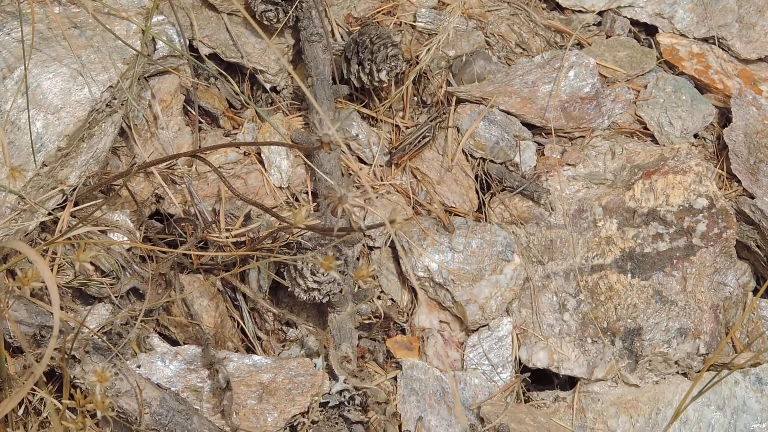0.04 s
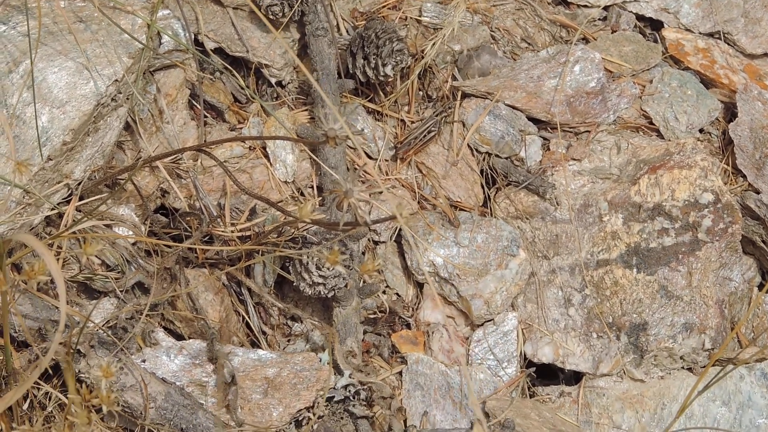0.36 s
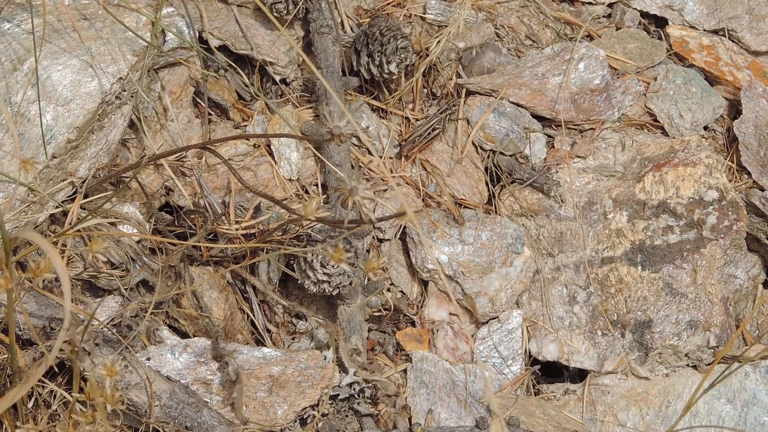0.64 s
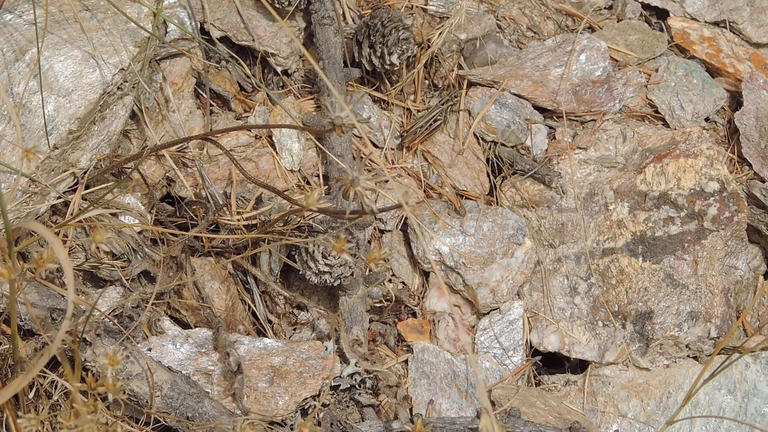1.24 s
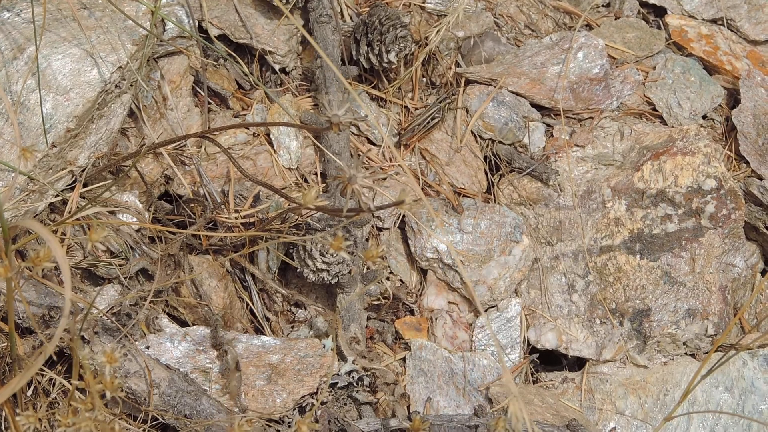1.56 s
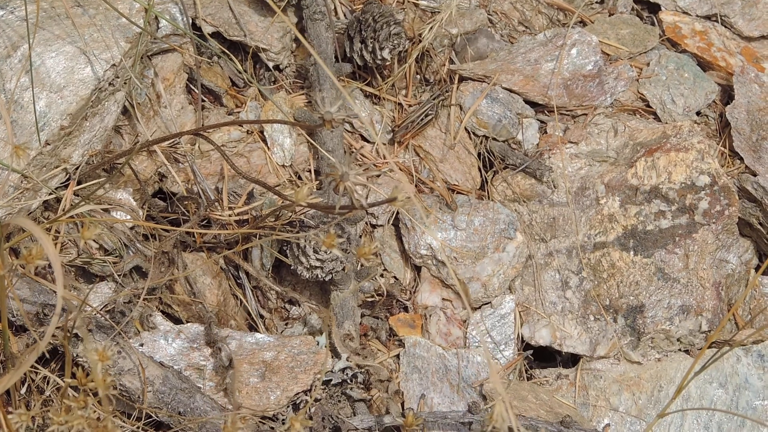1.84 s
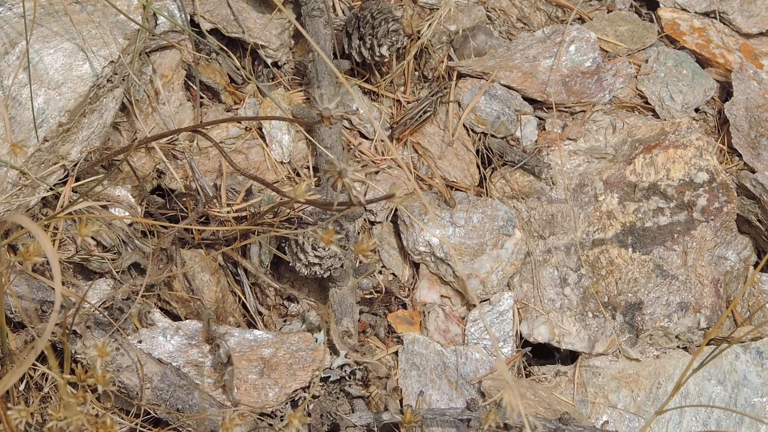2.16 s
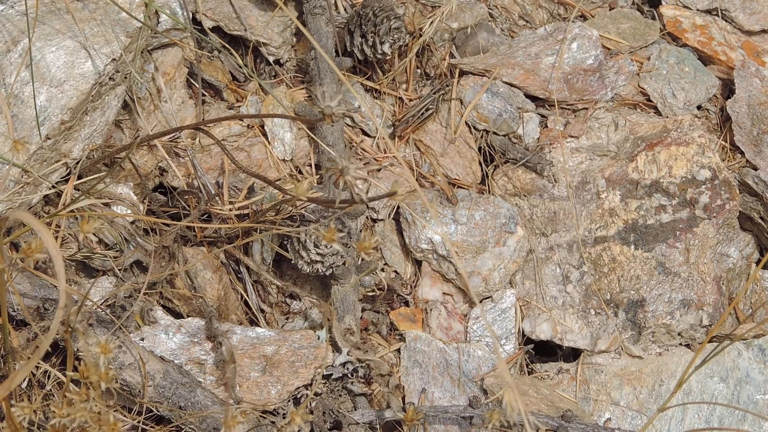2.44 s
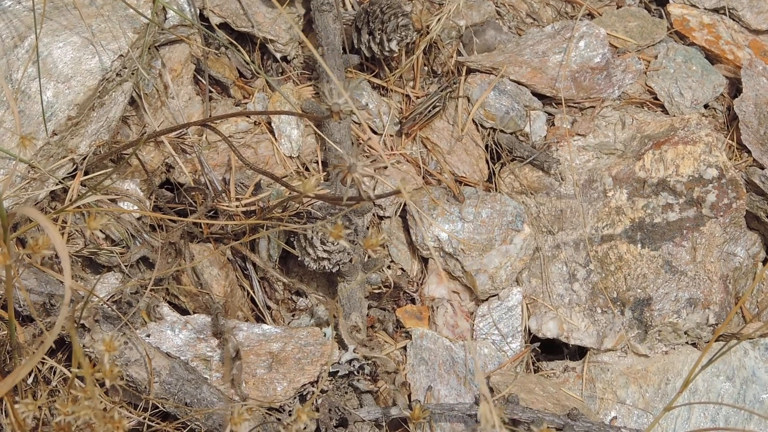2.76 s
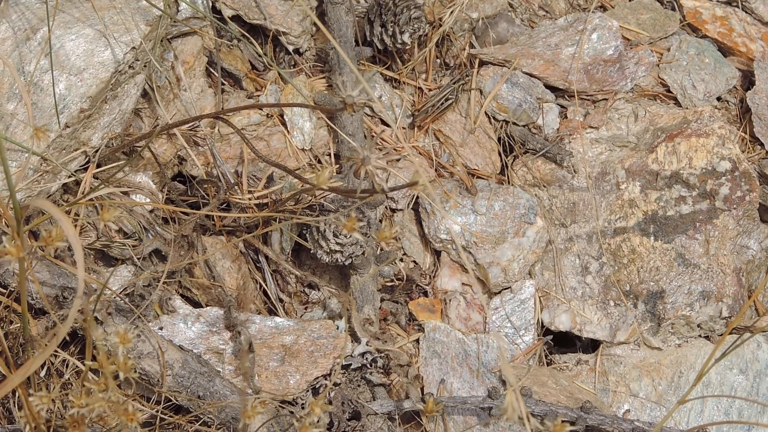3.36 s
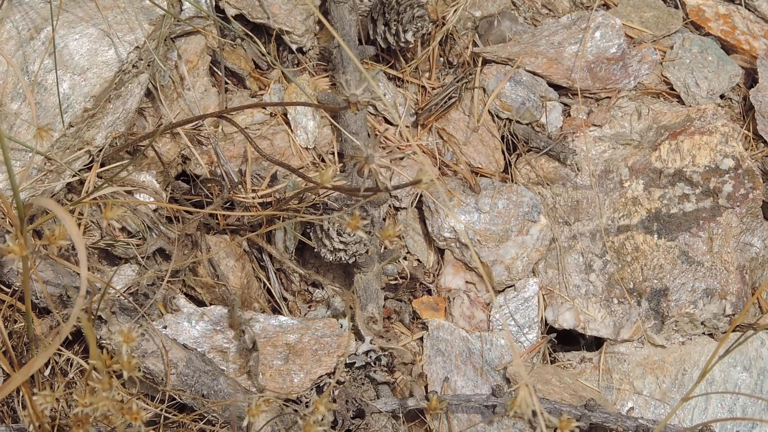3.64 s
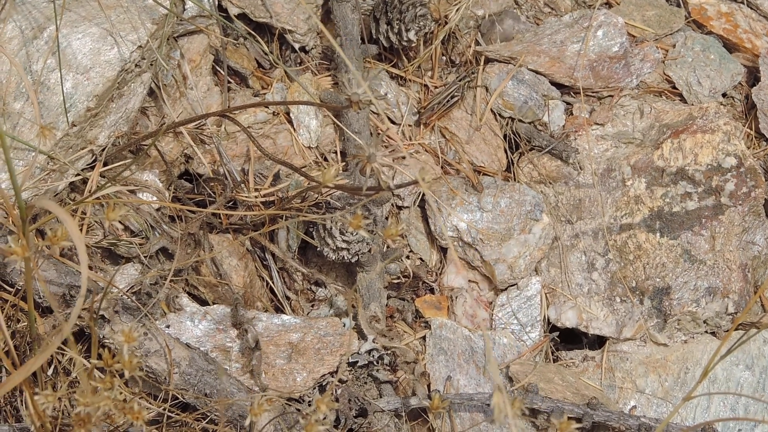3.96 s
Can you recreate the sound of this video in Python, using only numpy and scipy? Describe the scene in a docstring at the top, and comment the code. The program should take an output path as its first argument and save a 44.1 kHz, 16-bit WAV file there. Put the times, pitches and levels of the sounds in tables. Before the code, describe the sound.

Light, gusty wind rumbles and thumps on the microphone, mostly on the right, over a faint outdoor hiss. Near the end, a grasshopper on dry, stony ground begins a faint, high, pulsing buzz that swells.

```python
"""On dry stony ground, a light, gusty wind buffets the two ports (openings) of a microphone,
mostly the right one. Its eddies, small swirls of air, rumble and thump over a faint outdoor hiss.
Near the end a grasshopper starts to sing, and its song swells. Each leg stroke drags a file of tiny
teeth over the wing and makes it ring in short pulses, one strong and then several weaker."""
import sys
import numpy as np
from scipy import signal
from scipy.fft import rfft, irfft
from scipy.io import wavfile
from scipy.ndimage import uniform_filter1d

SR = 44100
rng = np.random.default_rng(int(sys.argv[2]) if len(sys.argv) > 2 else 0)


def to_wav(sig):
    """Store sig (one row per channel, or 1-D mono) as 16-bit WAV at the path in sys.argv[1].

    Samples outside -1..1 are clipped; the rate is SR.
    """
    pcm = np.clip(np.atleast_2d(sig), -1, 1) * 32767
    pcm = np.round(pcm).astype(np.int16)
    wavfile.write(sys.argv[1], SR, pcm.T)  # frames by channels


N = 176400
TIME = np.arange(N) / SR


def from_db(db):
    """Turn decibels into a number to multiply a sound by."""
    return 10 ** (np.asarray(db) / 20)


def rms_one(x):
    """Scale a sound so that its average strength (rms) is 1."""
    return x / np.sqrt(np.mean(x ** 2) + 1e-20)


def even_out(x, samples):
    """Hold a sound's strength near 1, averaged over this many samples."""
    return x / np.sqrt(uniform_filter1d(x ** 2, size=samples) + 1e-9)


def level_at(points, hz):
    """Read a level between the rows of a tone table, giving each octave equal room."""
    f, db = np.transpose(points)
    return np.interp(np.log(hz), np.log(f), db)


def drift(hz):
    """A smooth random wobble of about 1 either way; a higher hz makes it quicker."""
    step, warm_up = 40, 2000
    pole = np.exp(-2 * np.pi * hz * step / SR)
    noise = rng.standard_normal(N // step + warm_up + 2)
    slow = signal.lfilter([1], [1, -2 * pole, pole * pole], noise)[warm_up:]
    return np.interp(np.arange(N) / step, np.arange(len(slow)), rms_one(slow))


def butter(x, hz, kind, order=2):
    """Keep the "low" part, the "high" part or one "band" of a sound."""
    return signal.sosfilt(signal.butter(order, hz, kind, fs=SR, output="sos"), x)


# Tone of a faint steady hiss, its treble cut away above about 13 kHz: f/Hz, relative level/dB
HISS_TONE = [(60, 4), (300, 0.5), (700, 2.5), (1600, -1), (2500, -4.5), (4000, -10), (7000, -14),
             (10000, -16.5), (13200, -18), (14200, -28), (16000, -32)]

def steady_hiss(level_db=-58, shared_power=0.073):
    """A steady, smooth hiss; left and right share only a little of it."""
    hz = np.maximum(np.arange(N // 2 + 1) * SR / N, 1)
    separate = np.sqrt(1 - shared_power) * rng.standard_normal((2, N))
    shared = np.sqrt(shared_power) * rng.standard_normal(N)
    spectrum = rfft(separate + shared) * from_db(level_at(HISS_TONE, hz))
    return from_db(level_db) * rms_one(irfft(spectrum, N))


# The wing's low ring and its high rings: f/Hz, width/Hz, relative level/dB
LOW_RING = (7520, 1470, -6.5)
HIGH_RINGS = [(10370, 3100, -19), (13300, 4500, -2.5), (15450, 610, -12)]

def wing_rasp(teeth_per_s=3900, tooth_spread_db=2):
    """Teeth click and scrape, and the wing rings. Gives two rows: low ring, high rings."""
    teeth_passed = np.floor(np.cumsum(teeth_per_s * (1 + 0.15 * drift(300))) / SR)
    new_tooth = np.diff(teeth_passed, prepend=0) > 0
    clicks = new_tooth * from_db(tooth_spread_db * rng.standard_normal(N))
    rasp = rms_one(clicks) + rng.standard_normal(N)

    def ring(hz, width_hz, db):
        return from_db(db) * rms_one(butter(rasp, [hz - width_hz / 2, hz + width_hz / 2], "band"))
    return np.array([ring(*LOW_RING), sum(ring(*row) for row in HIGH_RINGS)])


def leg_stroke(start, later_db, first_s=.012, later_s=.009, spacing_s=.0093):
    """The push of leg on wing: one strong pulse, then five fading, shorter ones over a light rub."""
    def pulse(onset, length_s):
        return np.sin(np.pi * np.clip((TIME - onset) / length_s, 0, 1))
    rub_db, rub_fade_db_per_s = -7, 68
    loss_per_pulse_db, spread_db = 1.1, 1.3
    rub = from_db(rub_db - rub_fade_db_per_s * np.abs(TIME - start)) * (TIME > start)
    force = np.maximum(rub, pulse(start, first_s))
    for k, (time_jitter, level_jitter) in enumerate(rng.standard_normal((5, 2))):
        onset = start + first_s + spacing_s * (k + .1 * time_jitter)
        db = later_db - loss_per_pulse_db * k + spread_db * level_jitter
        force = np.maximum(force, pulse(onset, later_s) * from_db(db))
    return force


# Leg strokes: t/s, level of the push/dB, extra for the low ring/dB, later pulses against the first/dB
LEG_STROKES = [(3.075, -74, 5, -2), (3.145, -70.5, 0, 0), (3.208, -61, -1, -5), (3.277, -60, -1, -2),
               (3.330, -58, -4, -3), (3.384, -57, -3.5, -3), (3.438, -56, -4, -6), (3.489, -57.5, -2, -4),
               (3.543, -54.5, 0.5, -6), (3.597, -55.5, -1, -3), (3.668, -55, -1.5, -2),
               (3.738, -55.5, -1.5, -2), (3.809, -54, -.5, -3), (3.879, -54.5, 3, -5),
               (3.950, -54.5, 4, -5)]

def grasshopper(echo_db=-5, echo_s=.08):
    """Leg strokes sound the wing; stones and twigs scatter a short echo, different on each side."""
    force = 0
    ends = [row[0] for row in LEG_STROKES[1:]] + [np.inf]
    for (start, db, low_db, later_db), end in zip(LEG_STROKES, ends):
        stroke = leg_stroke(start, later_db) * (TIME < end)
        force = force + stroke * from_db([[db + low_db], [db]])
    decay = from_db(-60 / (echo_s * SR)) ** 2   # the echo loses 60 dB in echo_s
    tail = np.sqrt(signal.lfilter([1 - decay], [1, -decay], force ** 2 + 1e-18))
    direct = np.sum(force * wing_rasp(), axis=0)
    echo = np.array([np.sum(tail * wing_rasp(), axis=0) for port in range(2)])
    return butter(direct + from_db(echo_db) * echo, hz=6200, kind="high", order=4)


# Rough puffs of wind: middle t/s, length/s, level before muffling/dB, top f/Hz
PUFFS = [(.466, 0.038, -34.5, 338), (0.514, 0.033, -29.5, 406), (0.532, 0.041, -33, 380),
         (0.754, .045, -37, 333), (0.963, 0.054, -40, 337)]

def rough_puffs(bottom_hz=209, muffle_hz=790):
    """Wind breaks into short swells of churning air, at the right port only."""
    right = np.zeros(N)
    for middle, length_s, db, top_hz in PUFFS:
        swell = np.cos(np.pi * np.clip((TIME - middle) / length_s, -.5, .5))
        churn = rms_one(butter(rng.standard_normal(N), [bottom_hz, top_hz], "band"))
        right += from_db(db) * swell * even_out(churn, samples=900)
    return np.array([np.zeros(N), butter(right, muffle_hz, "low")])


# Single eddies hitting a port: t/s, peak level on the louder side/dB, width/s, left minus right/dB
THUMPS = [(.072, -28.5, .0012, -17), (0.298, -20.5, .002, -24), (.408, -24, 0.0014, -22),
          (.459, -19.5, .0009, -30), (.507, -19, 0.0011, -26), (.515, -28.5, 0.00039, -30),
          (0.515, -26, .0014, 12), (.521, -13.5, 0.00107, -29), (.541, -16.5, .0012, -24),
          (.583, -21.5, 0.00083, -27), (.627, -19.5, .0015, -20), (.753, -13.5, 0.0014, -33),
          (.808, -27, 0.0017, 15), (.846, -26, 0.0012, 2), (.933, -20.5, 0.0012, -10),
          (0.966, -22.5, 0.0015, -20), (0.992, -24, 0.0011, -20), (1.196, -20.5, 0.0022, -12),
          (1.636, -24, 0.0017, 15), (1.803, -23.5, 0.00097, -29), (1.887, -29, 0.0013, 21),
          (1.924, -21, 0.0015, -20), (1.962, -23, .0012, -23), (2.104, -23, 0.0013, -19),
          (2.189, -28, .002, 20), (2.281, -25, 0.0014, 20), (2.485, -24.5, .0013, -18),
          (2.731, -26, 0.0025, 10), (3.168, -24.5, 0.0015, -23), (3.274, -24, 0.00096, -30),
          (3.378, -19, 0.0022, -20), (3.461, -21, 0.0013, -25), (3.556, -17.5, .0016, -28),
          (3.610, -19, .0016, -20), (3.785, -32, .0014, 17), (3.841, -23, .0014, -23)]

def eddy_thumps():
    """Each eddy thumps: one smooth push of air pressure between two shallow dips."""
    out = np.zeros((2, N))
    for middle, db, width_s, pan_db in THUMPS:
        offset = (TIME - middle) / width_s
        push = 2 * np.exp(-offset ** 2 / 2) - np.exp(-(offset / 2) ** 2 / 2)
        left_db, right_db = db + min(pan_db, 0), db + min(-pan_db, 0)
        out += from_db([[left_db], [right_db]]) * push
    return out


# Wind pressure at the left and right ports: t/s, level before trim/dB
LEFT_GUSTS = [(0, -43), (.1, -39), (.24, -55.5), (.35, -43.5), (.45, -43), (.52, -31), (.58, -38.5),
              (.68, -31), (.72, -38), (.79, -27.5), (.86, -34), (.96, -38), (1.03, -44), (1.25, -38),
              (1.64, -35.5), (1.72, -48), (1.79, -34.5), (1.9, -36), (2.08, -40), (2.34, -34.5),
              (2.42, -42), (2.54, -44), (2.62, -35.5), (2.78, -36.5), (2.92, -45.5), (3.22, -38.5),
              (3.34, -46), (3.5, -46), (3.62, -40.5), (3.7, -43), (3.77, -37.5), (4.0, -45.5)]
RIGHT_GUSTS = [(0, -43), (.07, -34), (.11, -50), (.2, -47), (.29, -28.5), (.42, -31.5), (.47, -20),
               (.53, -24), (.6, -23.5), (.66, -29), (.75, -19.5), (.81, -32.5), (.87, -26), (.97, -29.5),
               (1.14, -37.5), (1.2, -25), (1.25, -38), (1.3, -30.5), (1.38, -45), (1.5, -36), (1.58, -42),
               (1.68, -28), (1.73, -36), (1.81, -30), (1.88, -34.5), (1.95, -22.5), (2.01, -32.5),
               (2.1, -30.5), (2.39, -34.5), (2.47, -27.5), (2.54, -34.5), (2.86, -34), (2.93, -41.5),
               (2.99, -31), (3.08, -34.5), (3.2, -29.5), (3.33, -32), (3.62, -28.5), (3.72, -35),
               (3.82, -28.5), (4.0, -33.5)]
# Tone of the rumble before it is shifted: f/Hz, relative level/dB
RUMBLE_TONE = [(20, -3), (40, 5.5), (100, 0.5), (170, -7), (235, -19), (340, -29.5), (480, -46.5),
               (800, -81)]
# The rumble's tone drifts, deepening near 1.45 s and most near 2.85 s: t/s, tone shift/octaves
TONE_SHIFT = [(0, -0.06), (1.25, 0.027), (1.45, -0.24), (1.75, 0.083), (2.2, 0.057), (2.4, -0.14),
              (2.7, -0.026), (2.85, -0.42), (3.1, -0.16), (3.25, 0.019), (4.0, -0.049)]

def wind_rumble(gusts, reference_db=-23.5, octaves_per_db=-0.0089, flutter_db=3, trim_db=-0.65):
    """Swirling air rumbles at one port. Its bands of noise flutter together, the upper ones most."""
    level_db = np.interp(TIME, *np.transpose(gusts))
    gust_octaves = octaves_per_db * (level_db - reference_db)   # louder moves the tone slightly down
    shift = 2 ** (gust_octaves + np.interp(TIME, *np.transpose(TONE_SHIFT)))
    edges_hz = 18 * 2 ** (np.arange(19) / 3)   # three bands to an octave
    flutter = drift(hz=25.6)
    rumble, power = 0, 0
    for low, high in zip(edges_hz, edges_hz[1:]):
        hz = np.sqrt(low * high)
        band = rms_one(butter(rng.standard_normal(N + SR), [low, high], "band")[SR:])
        gain = from_db(level_at(RUMBLE_TONE, hz / shift)) * np.sqrt(high - low)
        rumble = rumble + band * gain * from_db(flutter_db * min(hz / 180, 2) * flutter)
        power = power + gain ** 2
    return even_out(rumble / np.sqrt(power), samples=3500) * from_db(level_db + trim_db)


def scene():
    """Wind on the ports, hiss all round, the grasshopper straight ahead."""
    rumble = np.array([wind_rumble(LEFT_GUSTS), wind_rumble(RIGHT_GUSTS)])
    wind = rumble + eddy_thumps() + rough_puffs()
    return wind + steady_hiss() + grasshopper()


def record(dry, cutoff_hz=15700):
    """Cut off the very highest treble steeply."""
    return signal.sosfilt(signal.ellip(12, .1, 80, cutoff_hz, fs=SR, output="sos"), dry)


dry = scene()
out = record(dry)
to_wav(out)
```